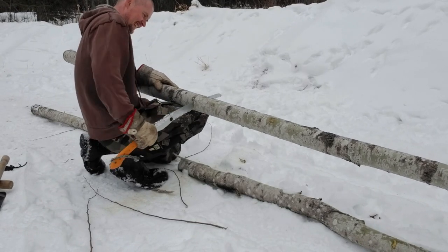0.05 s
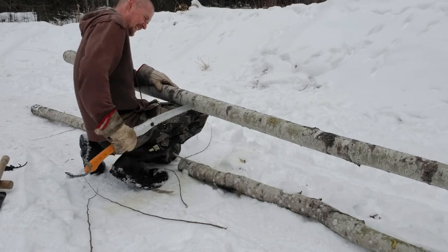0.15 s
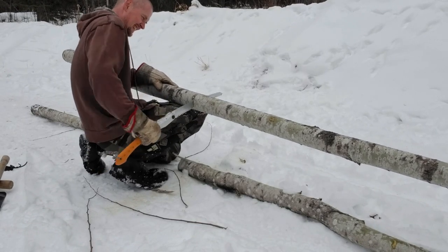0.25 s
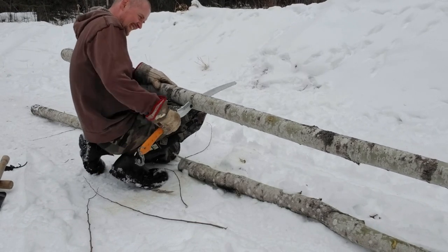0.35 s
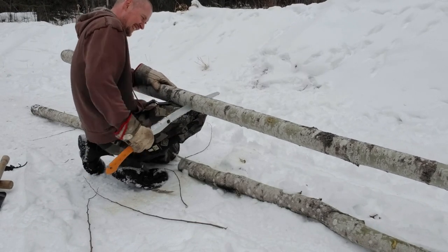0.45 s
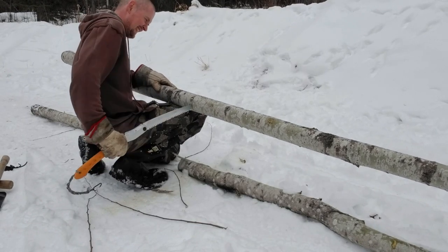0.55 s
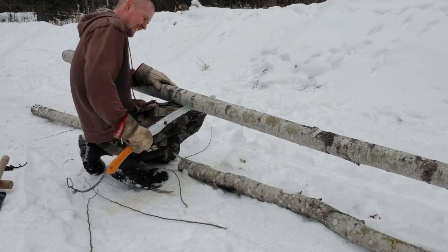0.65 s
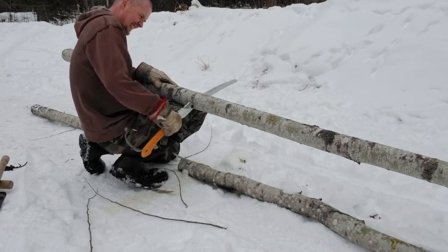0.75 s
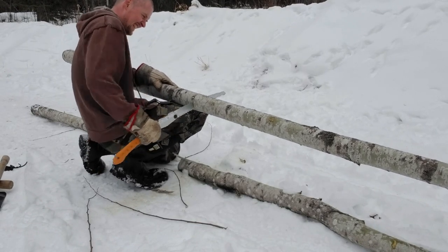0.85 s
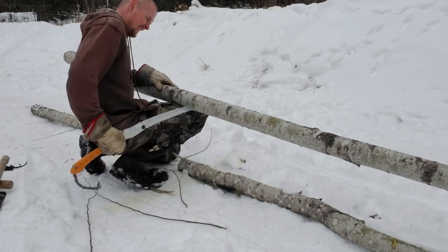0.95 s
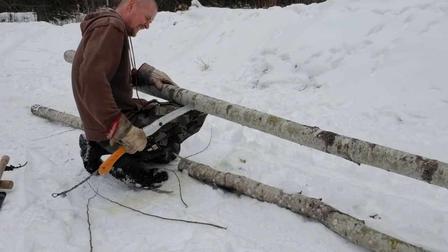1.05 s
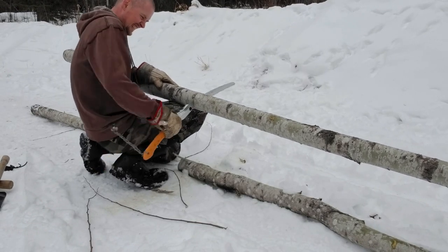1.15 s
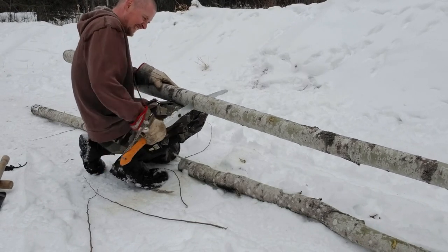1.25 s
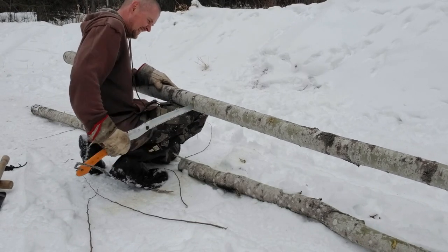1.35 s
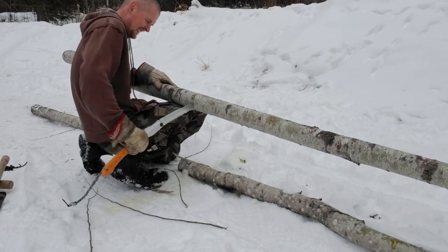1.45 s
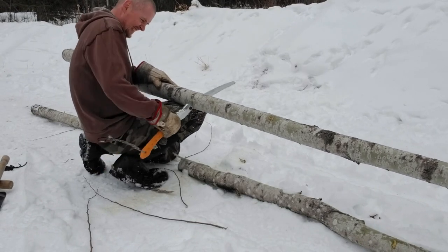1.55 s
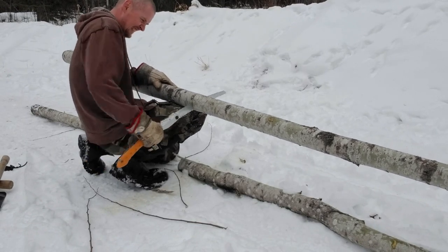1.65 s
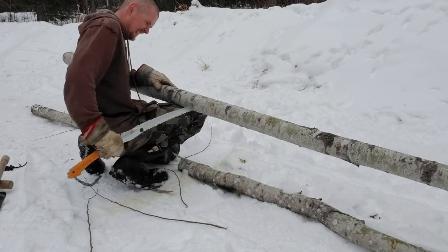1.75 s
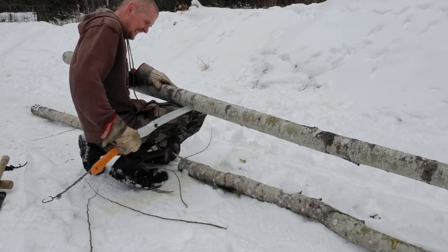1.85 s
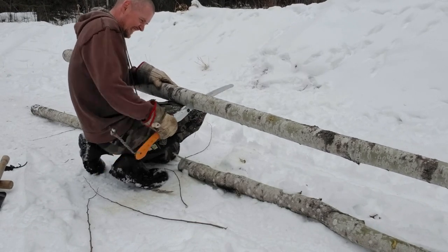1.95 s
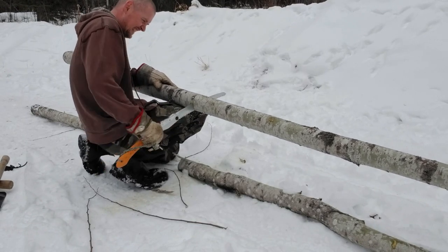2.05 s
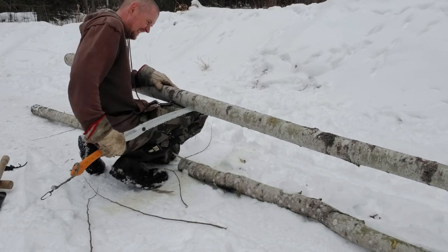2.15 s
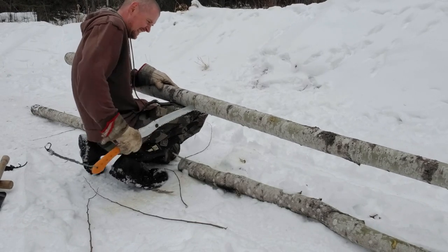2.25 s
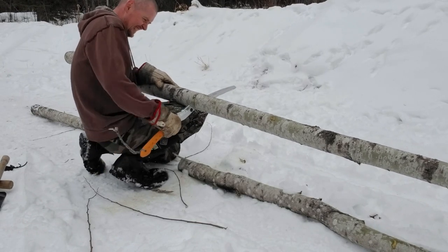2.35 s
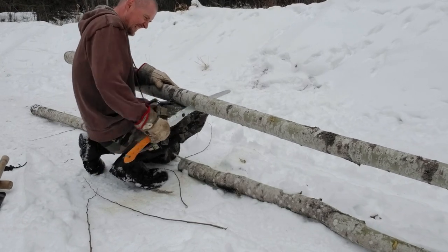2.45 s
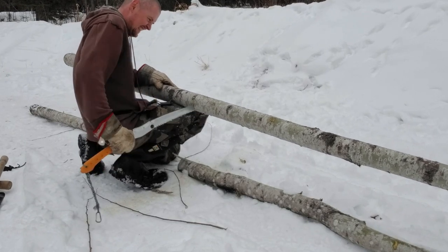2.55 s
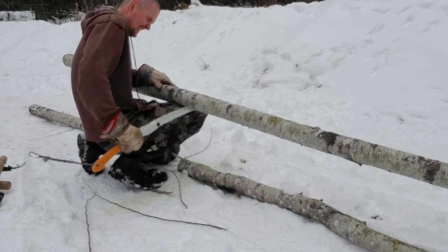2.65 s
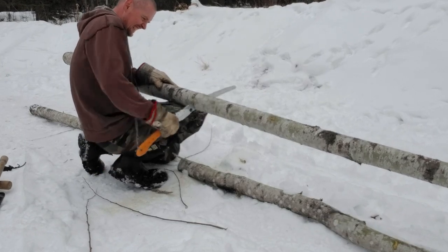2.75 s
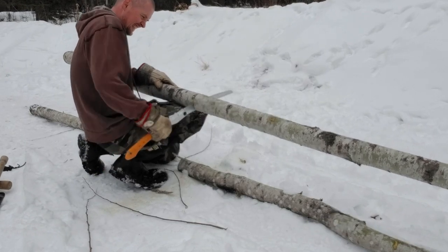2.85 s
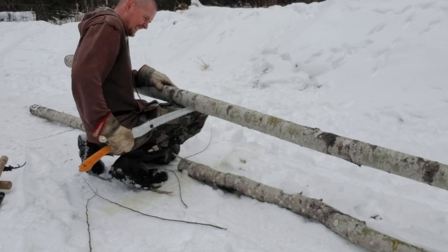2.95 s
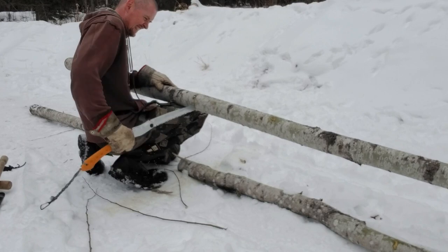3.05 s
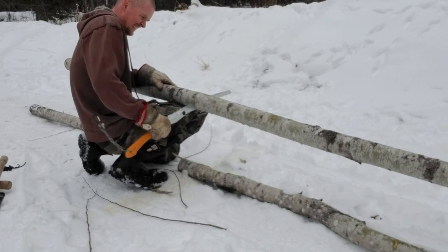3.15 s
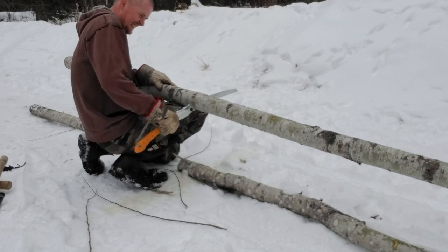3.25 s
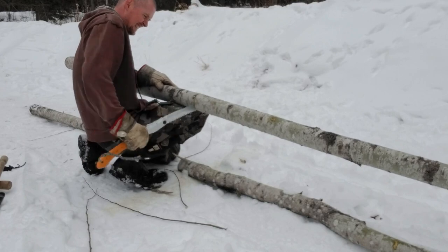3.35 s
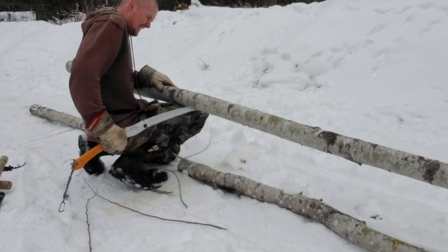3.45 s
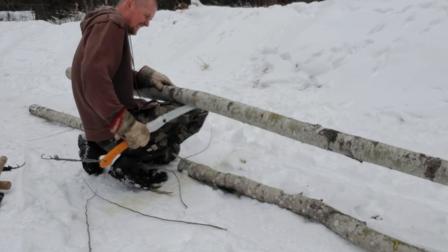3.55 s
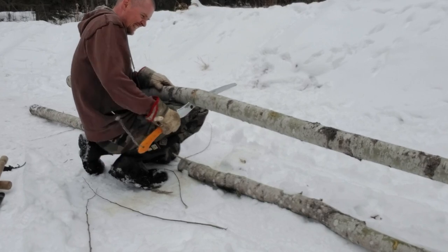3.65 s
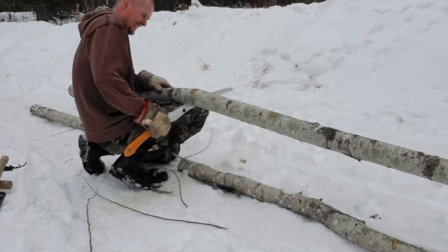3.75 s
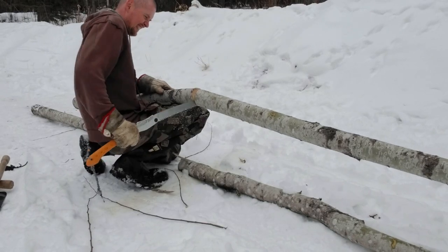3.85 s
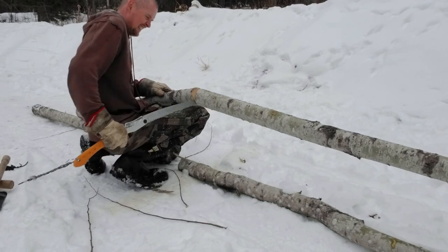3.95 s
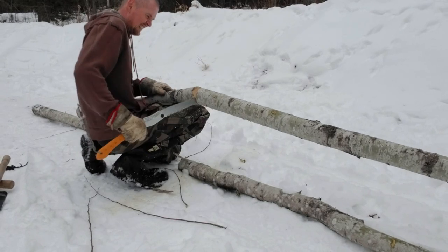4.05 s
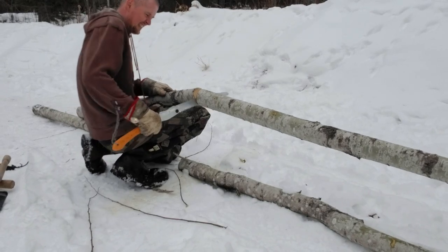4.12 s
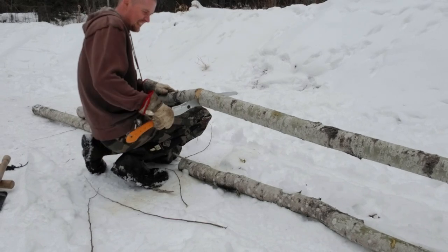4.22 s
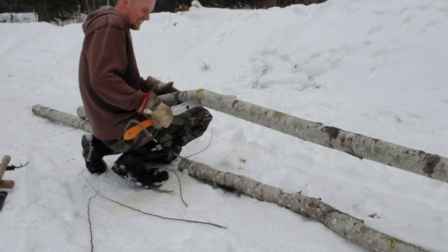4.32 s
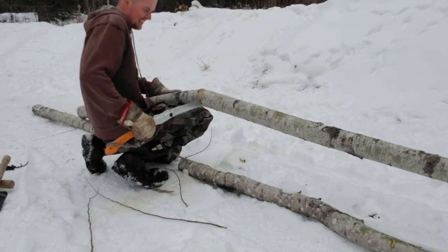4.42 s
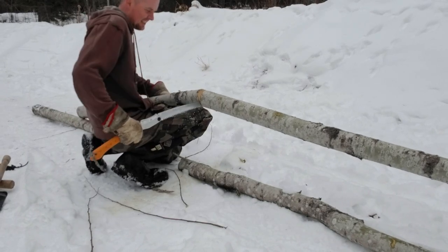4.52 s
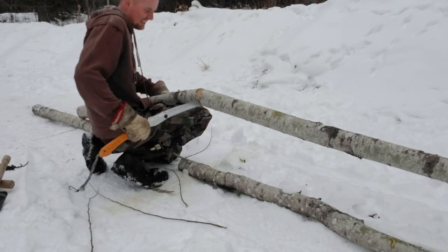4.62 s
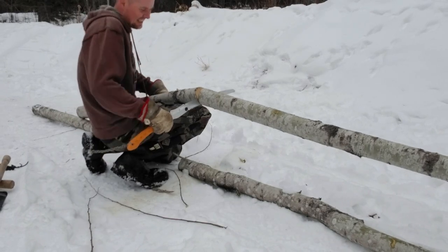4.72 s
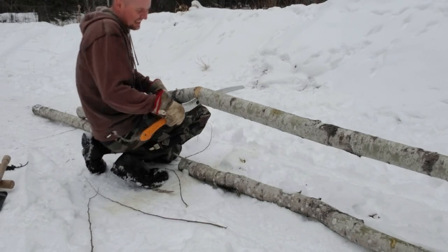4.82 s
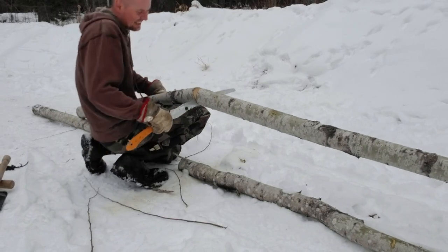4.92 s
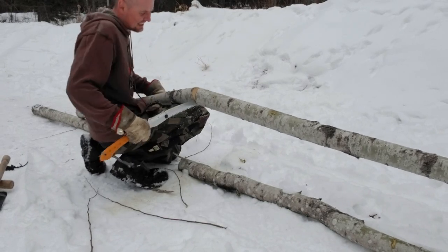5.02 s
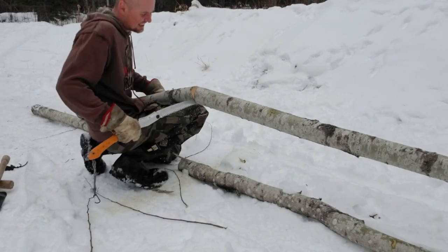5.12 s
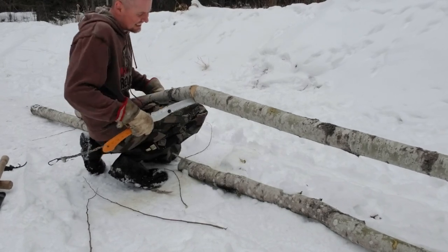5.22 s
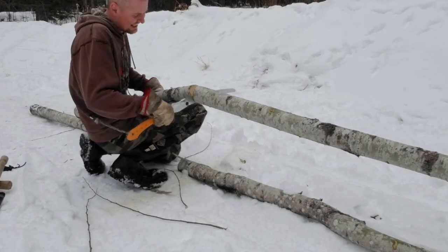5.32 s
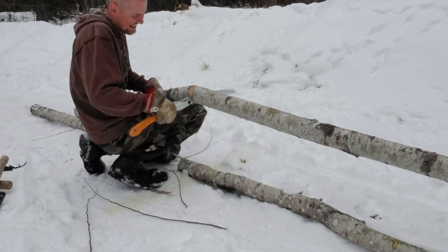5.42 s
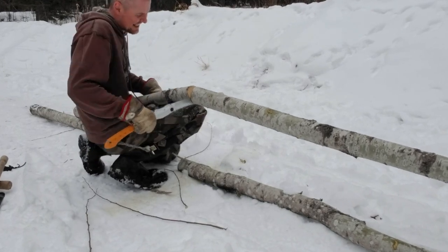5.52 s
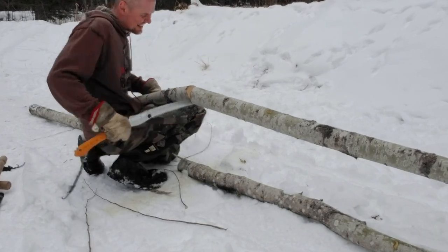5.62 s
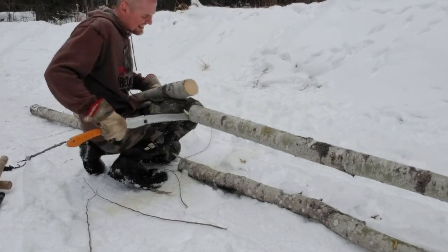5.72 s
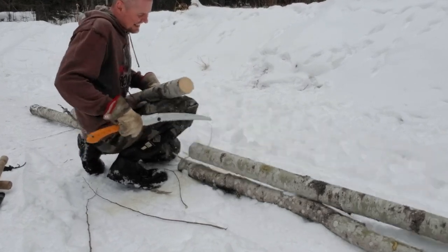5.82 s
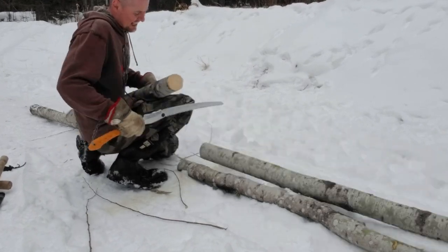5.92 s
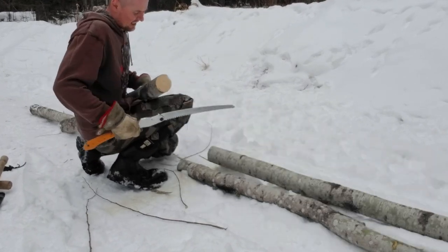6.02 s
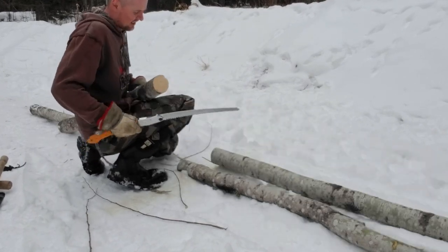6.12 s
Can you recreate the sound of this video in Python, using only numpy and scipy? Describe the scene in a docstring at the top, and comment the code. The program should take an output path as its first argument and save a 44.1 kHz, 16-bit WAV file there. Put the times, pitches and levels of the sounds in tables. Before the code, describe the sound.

Quick back-and-forth hand sawing of wood, weakening as the blade pinches, ends with a snap and the loud thud of a falling log.

```python
"""Sawing a green pole

A folding hand saw cuts green wood, outdoors on snow. Its teeth tear fibres in a train of tiny impulses
that force the resonances of blade and pole. Stick-slip friction makes hard pulls judder, and the saw
now and then jams with a knock. The kerf pinches, the strokes slow and the blade squeals; the last
fibres snap, a sleeve rustles, and the cut length lands with the loud thud of its damped modes."""
import sys
import numpy as np
from scipy import signal
from scipy.fft import rfft, irfft, next_fast_len
from scipy.io import wavfile
from scipy.ndimage import map_coordinates

SR = 44100
rng = np.random.default_rng(int(sys.argv[2]) if len(sys.argv) > 2 else 0)


def store_wav(level_fs):
    """Save 16-bit WAV to argv[1]."""
    pcm = np.round(np.clip(np.atleast_2d(level_fs), -1, 1) * 32767)
    wavfile.write(sys.argv[1], SR, pcm.T.astype(np.int16))


N = 272538
TIME = np.arange(N) / SR

# Spectrum of the outdoor background: (frequency [Hz], level [dB])
AIR_SPECTRUM = [(20, -23), (70, 3), (130, 0), (220, -14), (500, -9), (2000, -33), (5000, -31),
                (16000, -19.5)]
# Pull and push in turn, each lasting until the next: (start [s], force [dB], rise share [ratio])
STROKES = [(-.05, -1, 0.566), (0.192, 0.5, .57), (0.378, 0, 0.45), (0.608, 2.5, 0.617), (0.781, 0, 0.56),
           (1.012, 0, 0.499), (1.213, 1.5, 0.5), (1.414, 1.5, 0.533), (1.602, 1, 0.49), (1.816, 0, .6),
           (2.008, 0.5, 0.46), (2.226, 0.5, 0.556), (2.414, 0.5, 0.53), (2.633, 1, 0.596),
           (2.805, .5, 0.59), (3.036, -1.5, 0.53), (3.251, 0.5, 0.47), (3.494, -0.5, 0.61),
           (3.704, -1, 0.41), (3.979, -9.5, 0.51), (4.28, -7.5, 0.54), (4.565, -7.5, 0.663),
           (4.844, -4, 0.52), (5.138, -8, 0.58), (5.41, -3.5, 0.57), (5.721, 2, 0.47)]
# Stroke envelopes; the rows are hiss, rasp and drone: (level [dB], swell [s], fade [s])
PULL_ENVELOPES = [(-31.5, .135, .14), (-41.5, 0.14, 0.13), (-51, 0.17, 0.13)]
PUSH_ENVELOPES = [(-36, .105, .14), (-42, 0.13, 0.1), (-55, 0.13, 0.11)]
# Growth of level with force: (hiss [dB/dB], rasp [dB/dB], drone [dB/dB])
FORCE_SLOPES = [1.28, 0.91, 2.15]
# Ring of the blade as the pole sags and the kerf pinches: (time [s], level [dB])
PINCH_LEVELS = [(0, -61), (2.4, -61), (2.9, -59), (3.55, -55), (4.05, -44), (4.7, -51), (5.6, -46.5),
                (5.8, -48)]
# The blade binds and the hand all but stops: (time [s], half length [s], dip [dB])
BINDING = (4.26, 0.061, -19)
# Stick-slip as a hard stroke gets going: (start [s], initial rate [Hz], depth [dB])
JUDDERS = [(.035, 57, 2.5), (.41, 63, 1.5), (1.266, 64, 2.5), (2.855, 54, 3.5), (3.284, 45.2, 4.5),
           (3.726, 44, 3), (4.046, 51.8, 2.5), (4.43, 48, 2), (4.899, 45, 4.5), (5.475, 44, 2)]
# The teeth dig in: (time [s], change of bite [dB])
SNAGS = [(1.258, 0), (2.288, -2), (2.444, 7.5), (2.888, 1.5), (4.433, 9.5), (4.896, 2.5), (5.473, 7.5)]
# Spectra of the teeth's hiss, their finest sizzle and the pole's drone: (frequency [Hz], level [dB])
HISS_SPECTRUM = [(300, -35), (900, -32), (2800, -1), (4100, -5.5), (5500, -4.5), (6600, -5), (7200, -3),
                 (8000, -0.5), (9500, -12), (12400, -3.5), (15800, 0)]
SIZZLE_SPECTRUM = [(3000, -24.5), (7000, -19.5), (10000, -4), (11300, -1.5), (12400, 2.5), (14000, -1),
                   (15800, -1.5)]
DRONE_SPECTRUM = [(25, -22), (60, -3), (110, -4.5), (180, 2.5), (300, -9), (450, -18), (900, -33),
                  (3000, -70)]
# Resonances of blade and pole under the teeth: (frequency [Hz], bandwidth [Hz], gain [dB])
RASP_MODES = [(430.4, 41.7, 1), (502, 59, -2.5), (718, 137, 2.5), (1099, 86, 3.5), (1295, 120, 3.5),
              (1684, 222, 3), (2080, 430, -1), (2770, 500, -7.5), (6570, 300, -7)]
# Hollow scrape of the backs of the teeth on the push: (frequency [Hz], bandwidth [Hz], gain [dB])
SCRAPE_MODES = [(1045, 42, 0), (1330, 99, -1), (1630, 210, -6.5)]
# Resonances of the pinched blade: (frequency [Hz], bandwidth [Hz], gain [dB])
PINCH_MODES = [(2097, 270, -1.5), (2384, 230, -2.5), (2780, 300, -2), (3300, 1040, -9.5), (4340, 2500, -15)]
# Blows as the saw jams and as the pole breaks off, lands and bounces:
# (time [s], level [dB], centre frequency [Hz], spread [octaves])
KNOCKS = [(.351, -20, 416, 1.1), (.760, -15, 400, 1.16), (1.186, -37.5, 675, .5), (2.403, -40, 680, 0.77),
          (2.795, -18.5, 434, 2.1), (3.953, -26.5, 148, 0.51), (3.962, -29.5, 363, 0.37),
          (4.830, -34.5, 330, 0.93), (5.694, -14.5, 715, .13), (5.846, -5.5, 417, 0.26),
          (5.850, -22, 1230, 0.62), (5.899, -26.5, 920, .43), (5.936, -33, 198, 0.23),
          (6.026, -34, 260, 1.8)]
# Modes of the pole: (frequency [Hz], level [dB], t60 [s])
POLE_MODES = [(75, -23, .15), (146, -5, .18), (195, -5, .08), (238, -2, .07), (280, -6, .09), (340, -2, .1),
              (405, 0, .07), (520, -4, .05), (690, -2, .045), (813, -8, .04), (1080, -8, .03),
              (1320, -4, .02), (1620, -6, .02), (2110, -14, .05), (2450, -14, .03)]
# Cracks of fibres and bark: (time [s], level [dB], centre frequency [Hz])
SPLINTERS = [(.760, -24.5, 1500), (.794, -32, 6000), (2.795, -31, 1500), (3.699, -29, 1500),
             (3.722, -28, 2000), (3.962, -24.5, 2600), (4.065, -27, 2400), (5.673, -29, 4000),
             (5.681, -28, 4000), (5.693, -24.5, 4000), (5.845, -21.5, 12000), (5.850, -19.5, 1800),
             (5.854, -16.5, 1100), (5.881, -26, 13000), (5.899, -18.5, 13000)]
# Spectrum of a crack's broad tick: (frequency [Hz], level [dB])
TICK_SPECTRUM = [(200, 7), (1000, 0), (2600, 5), (4200, -15.5), (8000, -10), (12000, 0), (16000, 8.5)]
# Squeal of the blade in the closing kerf: (time [s], level [dB])
SQUEAL_LEVELS = [(4.29, -65), (4.325, -50.5), (4.34, -43), (4.40, -37.5), (4.43, -34.5), (4.455, -38),
                 (4.49, -64)]
# Bending modes of the squealing blade: (frequency [Hz], bandwidth [Hz], gain [dB])
SQUEAL_MODES = [(2110, 110, -5), (2250, 81, -9), (2450, 230, -9.5)]
# Rustle of clothes as the saw is lifted away: (time [s], level [dB])
SLEEVE_LEVELS = [(5.79, -52.5), (5.815, -54), (5.85, -34), (5.91, -44), (6.118, -46), (6.132, -54),
                 (6.18, -59)]
# Spectrum of rubbing cloth: (frequency [Hz], level [dB])
CLOTH_SPECTRUM = [(100, -5), (300, -7.5), (1200, -7.5), (2100, -7), (4000, -15), (8000, -14.5),
                  (12000, -10), (16000, -6.5)]
# Modes of the cut-off log: (frequency [Hz], level [dB], t60 [s])
LOG_MODES = [(121, -29, 0.34), (148, -18.5, 0.2), (209, -22.5, 0.18), (242, -19, 0.099), (274, -12.5, 0.13),
             (331, -26, 0.18), (404, -30, 0.052), (533, -15.5, 0.072), (810, -42, 0.053)]
# Stereo width, as a filter on the side signal: (frequency [Hz], gain [dB])
SIDE_GAIN = [(40, -2), (100, -14), (300, -10.5), (700, -8.5), (1400, -9), (3000, -2.5), (4300, -2),
             (6600, -3.5), (8500, -4.5), (13000, -10), (16000, 4.5)]
# Leftward lean of the sound: (frequency [Hz], left minus right gain [dB])
LEFT_BIAS = [(60, 1.5), (110, 0.93), (200, 1.7), (380, 1.3), (700, 1.9), (1290, 2), (2380, 0.51),
             (4400, 2.2), (8120, 2.2), (15000, 3.6)]

SAW_FREE_S, LANDING_S = 5.848, 5.854
BAND_LIMIT_HZ = 15950


def amp(db):
    """Amplitude grows tenfold for every 20 dB."""
    return 10 ** (np.asarray(db) / 20)


def unit(x):
    """Normalisation brings a signal to an rms of one."""
    return x / np.sqrt(np.mean(x ** 2) + 1e-20)


def colour(x, points):
    """Filtering multiplies the spectrum by a curve of (Hz, dB) points, joined over log frequency."""
    size = next_fast_len(x.shape[-1] + 2048)
    hz, db = np.transpose(points)
    bins_hz = np.fft.rfftfreq(size, 1 / SR)
    gain = amp(np.interp(np.log(bins_hz + 1), np.log(hz + 1), db))
    return irfft(rfft(x, size) * gain, size)[..., :x.shape[-1]]


def resonate(x, modes):
    """A forced response is a sum of resonances (Hz, bandwidth, dB), here of alternating sign."""
    return sum((-1) ** k * amp(db) * signal.lfilter(*signal.iirpeak(hz, hz / width, SR), x)
               for k, (hz, width, db) in enumerate(modes))


def drift(per_s):
    """Interpolation between random values, per_s a second, gives a continuous fluctuation."""
    knots = rng.standard_normal(4000)
    return unit(np.interp(TIME * per_s, np.arange(len(knots)), knots))


def grains(per_s, spread_db, smooth):
    """Shot noise: tiny fractures of uneven size over a smooth rub, as middle and side signals."""
    size = amp(spread_db * np.minimum(rng.exponential(1, N), 4))
    clicks = size * (rng.random(N) < per_s / SR) * rng.standard_normal((2, N))
    return unit(unit(clicks) + smooth * rng.standard_normal((2, N)))


def add(mix, start_s, sound):
    """Superposition: a sound adds to the mix from its start time on."""
    part = mix[:, round(start_s * SR):][:, :sound.shape[-1]]
    part += sound[..., :part.shape[-1]]


def air(level_db):
    """Ambient noise is steady and random, and strongest in the bass."""
    return amp(level_db) * unit(colour(rng.standard_normal((2, N)), AIR_SPECTRUM))


def stroke_lengths():
    """A stroke is half a cycle of reciprocating motion: the seconds from one turn to the next."""
    return np.diff([start for start, *_ in STROKES] + [SAW_FREE_S])


def motion(steepness, flatten, overlap_s):
    """Friction noise grows with speed and force. Gives velocity and hiss, rasp, drone and ring gains."""
    velocity, gains = np.zeros(N), np.zeros((4, N))
    pinch = amp(np.interp(TIME, *np.transpose(PINCH_LEVELS)))
    slopes = np.array(FORCE_SLOPES)[:, None]
    lengths = stroke_lengths()
    for k, ((start, force_db, rise_share), length) in enumerate(zip(STROKES, lengths)):
        now = (TIME > start - overlap_s) & (TIME < start + length + overlap_s)
        t = TIME[now] - start
        level_db, swell_s, fade_s = np.transpose(PUSH_ENVELOPES if k % 2 else PULL_ENVELOPES)[:, :, None]
        rising = (t + overlap_s) / (2 * rise_share * swell_s)
        falling = (length + overlap_s - t) / (2 * (1 - rise_share) * fade_s)
        arch = np.sin(np.pi / 2 * np.clip([rising, falling], 0, 1)).prod(0)
        velocity[now] += (-1) ** k * arch[0]  # positive on the pull
        # long strokes hold their level longer
        swell = arch ** (steepness * (np.median(lengths) / length) ** flatten)
        cutting = amp(level_db + force_db * slopes) * swell
        ring = pinch[now] * swell[1]
        gains[:, now] = np.hypot(gains[:, now], np.vstack([cutting, ring]))  # overlaps add in power
    bind_s, half_s, dip_db = BINDING
    return velocity, gains * amp(dip_db * np.exp(-((TIME - bind_s) / half_s) ** 2))


def shifting(x, depth_db, width_hz, hold_s):
    """Resonances come and go as the blade's free length changes; random spectral patches model them."""
    hz, t, spectrum = signal.stft(x, SR, nperseg=512, noverlap=384)
    grid = np.meshgrid(hz / width_hz, t / hold_s, indexing="ij")
    patches = unit(map_coordinates(rng.standard_normal((400, 700)), grid, order=1))
    _, shifted = signal.istft(spectrum * amp(depth_db * patches), SR, nperseg=512, noverlap=384)
    return unit(shifted[:, :N])


def saw(pull_hz, push_hz, tooth_db, uneven_db, hum_share):
    """Forced vibration: tearing fibres drive kerf, wood, blade and pole, pulsing at the tooth rate."""
    velocity, (hiss, rasp, drone, ring) = motion(steepness=1.894, flatten=0.11, overlap_s=.018)
    speed, pushing = abs(velocity), np.clip(-4 * velocity, 0, 1)
    tooth_hz = speed * (pull_hz + (push_hz - pull_hz) * pushing)
    teeth = np.sin(2 * np.pi * np.cumsum(tooth_hz * (1 + 0.06 * drift(45))) / SR)
    catch = judder(sharpness=0.094, stroke_share=0.52, quickening=0.42)
    catch *= snags(snag_s=0.028, nicks_per_s=18, nick_s=0.0058, nick_db=3.5)
    catch *= stalls(stall_s=0.033, above_db=-44, slope=.55)
    bite = unit(amp(tooth_db * teeth + uneven_db * drift(420)))

    chips = grains(per_s=6000, spread_db=0.4, smooth=1.57)
    sizzle = speed ** 2 * unit(colour(chips, SIZZLE_SPECTRUM))  # needs the most speed
    kerf = amp(-7.0) * unit(colour(chips, HISS_SPECTRUM)) + sizzle
    kerf = hiss * catch * shifting(kerf, depth_db=1.7, width_hz=170, hold_s=.035)

    fibres = grains(per_s=2200, spread_db=3.0, smooth=0.67)
    scrape = unit(resonate(grains(per_s=2100, spread_db=9, smooth=0.8), SCRAPE_MODES))
    wood = (1 - 0.11 * pushing) * unit(resonate(fibres, RASP_MODES)) + 0.57 * pushing * scrape
    wood = rasp * catch ** 0.43 * shifting(wood, depth_db=3.0, width_hz=134.2, hold_s=.05)

    flex = resonate(grains(per_s=1600, spread_db=2.5, smooth=0.95), PINCH_MODES)
    blade = ring * catch * shifting(flex, depth_db=2.6, width_hz=155, hold_s=.04)

    hum = np.array([[1], [0]]) * hum_share * teeth  # middle only
    pole = drone * catch ** 0.3 * unit(unit(colour(fibres, DRONE_SPECTRUM)) + hum)
    return bite * (kerf + wood + blade + pole)


def judder(sharpness, stroke_share, quickening):
    """Stick-slip modulates the level: the blade catches and tears free, quicker as it gains speed."""
    gain = np.ones(N)
    for start, first_hz, depth_db in JUDDERS:
        stroke = sum(s < start for s, *_ in STROKES) - 1
        length = stroke_share * stroke_lengths()[stroke]
        now = slice(int((start - .01) * SR), int((start + length) * SR))
        t = TIME[now] - start
        phase = 2 * np.pi * first_hz * t * (1 + quickening * t / (2 * length))
        bites = np.cos(phase) + sharpness * np.cos(2 * phase)
        gain[now] = unit(amp(depth_db * bites * signal.windows.tukey(len(t), .15)))
    return gain


def snags(snag_s, nicks_per_s, nick_s, nick_db):
    """Level follows depth of bite, which snags and small chance nicks change for a moment."""
    snag_db = sum(bite_db * np.exp(-(2 * (TIME - s) / snag_s) ** 2) for s, bite_db in SNAGS)
    nicks = rng.random(N) * (rng.random(N) < nicks_per_s / SR)
    bumps = signal.oaconvolve(nicks, np.hanning(round(2 * nick_s * SR)), "same")
    return amp(snag_db + nick_db * bumps)


def stalls(stall_s, above_db, slope):
    """Friction noise needs motion, so it dips when a knock briefly checks the blade."""
    dip_db = np.zeros(N)
    for s, level_db, *_ in KNOCKS:
        stall = np.interp(TIME - s, [.002, .007, .8 * stall_s, 1.2 * stall_s], [0, 1, 1, 0])
        dip_db += stall * slope * np.clip(level_db - above_db, 0, 20)
    return amp(-dip_db)


def knocks(scuff_s, scuff_db):
    """Impact excitation: each blow rings the pole's modes near its own pitch, with a dull scuff."""
    out, t = np.zeros((2, N)), np.arange(SR // 3) / SR
    hz, db, t60 = np.transpose(POLE_MODES)[:, :, None]
    modes = amp(db - 60 * t / t60) * np.cos(2 * np.pi * hz * t) * (1 - np.exp(-t / .0007))
    for s, level_db, centre_hz, octaves in KNOCKS:
        weight = np.exp(-.5 * (np.log2(hz / centre_hz) / octaves) ** 2)
        ring = np.array([[.72], [.09]]) * (weight * modes).sum(0) / np.linalg.norm(weight * amp(db))
        scuff = unit(resonate(rng.standard_normal((2, len(t))), [(centre_hz, centre_hz * octaves, 0)]))
        scuff = signal.lfilter(*signal.butter(2, 2.34 * centre_hz, fs=SR), scuff)
        add(out, s, amp(level_db) * (ring + amp(scuff_db) * scuff * np.exp(-t / scuff_s)))
    return out


def thin_bass(x, cutoff_hz):
    """A high-pass filter thins out the deepest bass of the blows and the landing."""
    return signal.lfilter(*signal.butter(2, cutoff_hz, "high", fs=SR), x)


def splinters(decay_s, width_share, tick_db):
    """Fracture frees stored strain: each fibre gives a short burst at its own pitch and a broad tick."""
    out, t = np.zeros((2, N)), np.arange(SR // 20) / SR
    for s, level_db, hz in SPLINTERS:
        body_noise, tick_noise = rng.standard_normal((2, 2, len(t)))
        body = unit(resonate(body_noise, [(hz, hz * width_share, 0)]))
        tick = amp(tick_db) * unit(colour(tick_noise, TICK_SPECTRUM))
        add(out, s, amp(level_db) * unit(body + tick) * np.exp(-t / decay_s))
    return out


def squeal(rough_db):
    """Frictional excitation: uneven slips of the gripped blade pump its bending modes."""
    level = amp(np.interp(TIME, *np.transpose(SQUEAL_LEVELS), left=-np.inf, right=-np.inf))
    slips = grains(per_s=1800, spread_db=3.5, smooth=0.54) * amp(rough_db * drift(120))
    return level * unit(resonate(slips, SQUEAL_MODES))


def sleeve():
    """Sliding friction of cloth and glove makes broadband noise as the arm comes up."""
    level = amp(np.interp(TIME, *np.transpose(SLEEVE_LEVELS), left=-np.inf))
    return level * unit(colour(grains(per_s=3300, spread_db=0.5, smooth=1.0), CLOTH_SPECTRUM))


def landing(rise_s, crush_db, crush_hz, crush_s):
    """An impulse starts all the log's modes in phase, in one deep thud, as the snow packs under it."""
    out, t = np.zeros((2, N)), np.arange(SR // 3) / SR
    ring = sum(amp(db - 60 * t / t60) * np.cos(2 * np.pi * hz * t) for hz, db, t60 in LOG_MODES)
    snow_band = signal.butter(2, [crush_hz / 2, 2 * crush_hz], "band", fs=SR)
    crush = unit(signal.lfilter(*snow_band, rng.standard_normal((2, len(t)))))
    thud = np.array([[1], [.22]]) * ring + amp(crush_db) * crush * np.exp(-t / crush_s)
    add(out, LANDING_S, thud * (1 - np.exp(-(t / rise_s) ** 2)))
    return out


def clearing(x, wet_db, t60):
    """Scattering from snow and trees adds a thin tail of decaying echoes."""
    t = np.arange(SR // 2) / SR
    echoes = rng.standard_normal((2, len(t))) * (rng.random(len(t)) < 2500 / SR)
    echoes *= amp(-60 * t / t60) * (t > .004)
    echoes /= np.linalg.norm(echoes[0])
    tail = colour(echoes, [(100, -0.5), (700, 9.0), (2000, 4.0), (5000, 7.0), (15000, -3.0)])
    return x + amp(wet_db) * signal.fftconvolve(x, tail, axes=1)[:, :N]


def scene():
    """Sources superpose as middle and side; a level difference places them a little to the left."""
    sources = saw(pull_hz=194.0, push_hz=218.2, tooth_db=-1.16, uneven_db=1.0, hum_share=1.01)
    sources += squeal(rough_db=1.5) + sleeve()
    blows = knocks(scuff_s=0.0062, scuff_db=-6.5)
    blows += landing(rise_s=0.00027, crush_db=-26.5, crush_hz=235, crush_s=0.027)
    sources += thin_bass(blows, cutoff_hz=81) + splinters(decay_s=0.0023, width_share=0.42, tick_db=3)
    middle, side = air(level_db=-64.0) + clearing(sources, wet_db=-21, t60=0.21)
    side = colour(side, SIDE_GAIN)
    left = colour(middle + side, [(hz, db / 2) for hz, db in LEFT_BIAS])
    right = colour(middle - side, [(hz, -db / 2) for hz, db in LEFT_BIAS])
    return np.array([left, right])


def record(dry):
    """Band limiting: a steep low-pass filter removes the highest treble."""
    low_pass = signal.firwin(511, BAND_LIMIT_HZ, window=("kaiser", 9), fs=SR)
    return signal.oaconvolve(dry, low_pass[None], "same")


dry = scene()
out = record(dry)
store_wav(out)
```